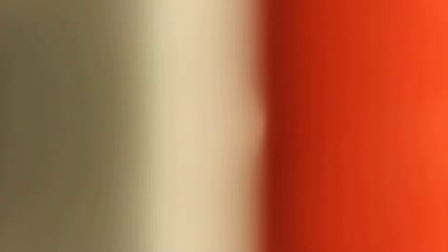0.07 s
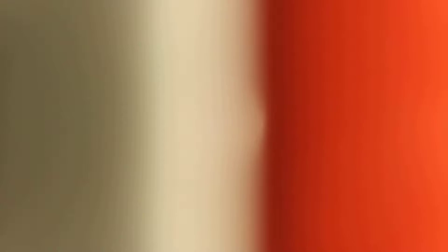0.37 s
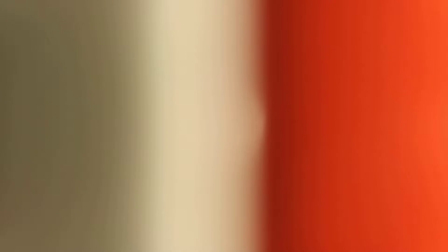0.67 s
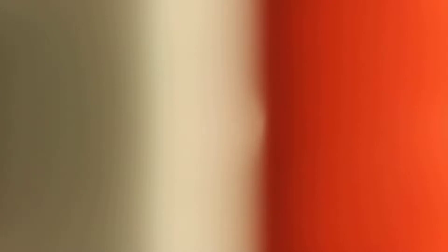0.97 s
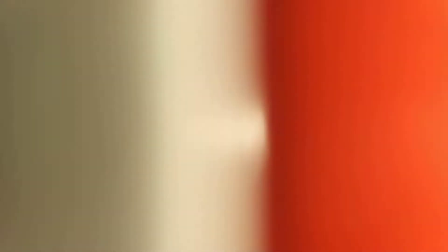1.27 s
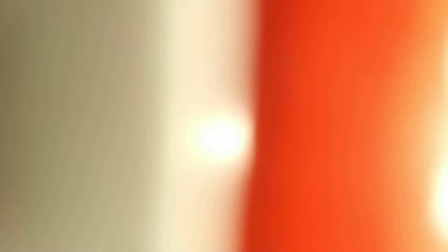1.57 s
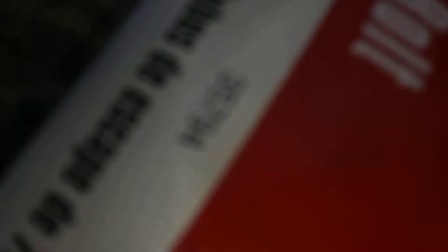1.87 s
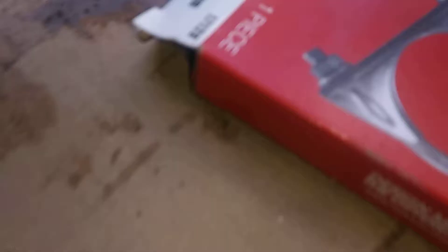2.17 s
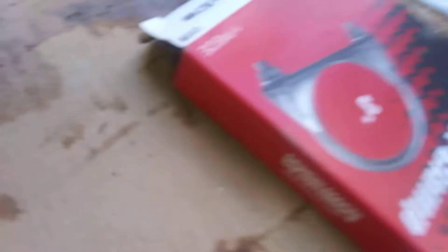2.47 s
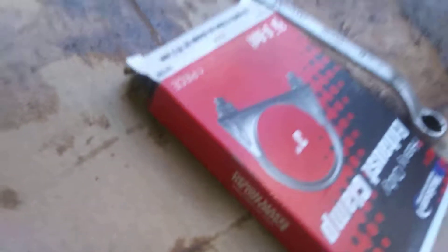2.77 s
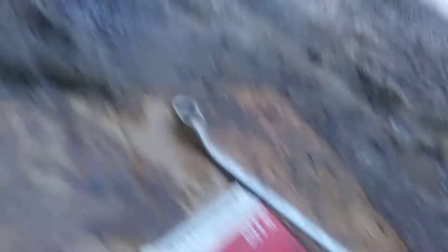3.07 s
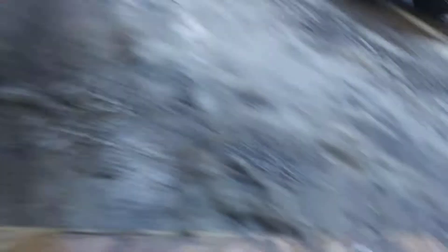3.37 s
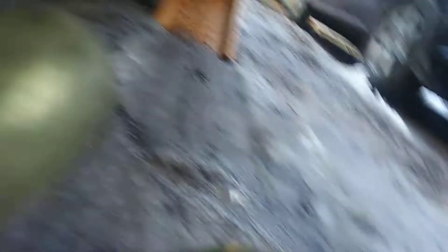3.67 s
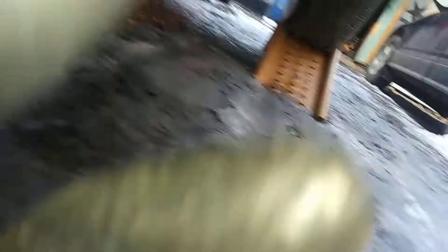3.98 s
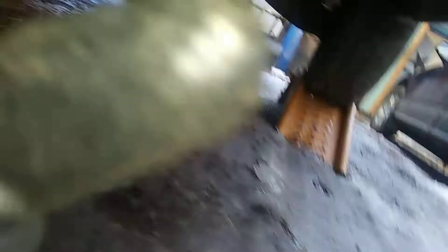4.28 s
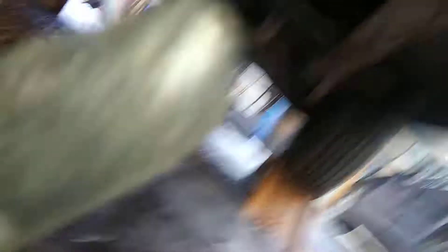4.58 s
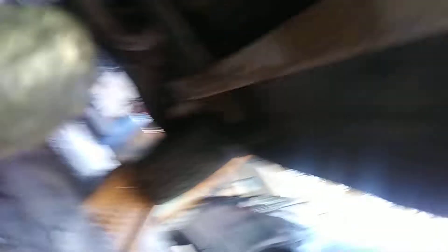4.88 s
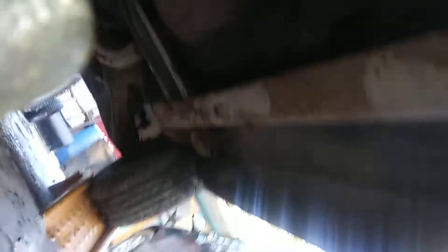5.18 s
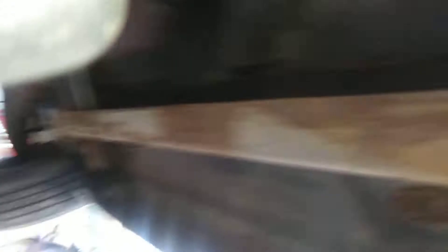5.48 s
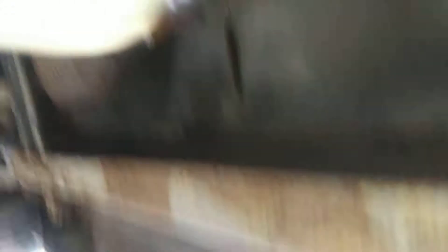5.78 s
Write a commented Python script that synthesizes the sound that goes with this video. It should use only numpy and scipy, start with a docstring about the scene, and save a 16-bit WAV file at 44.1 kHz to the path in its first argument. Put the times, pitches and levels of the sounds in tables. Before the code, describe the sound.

Handling noise comes first, right at the microphone: skin sliding on a plastic camera case and a cardboard box, with crisp snaps and dull taps. Then a low rumble grows into a hollow rush with a rising hiss, like a vehicle going by a driveway. It recedes into uneven clothing rustle, one soft bump on a hollow panel and a few crisp fabric scrapes, over a faint outdoor background.

```python
"""Hissing rubs, sharp clicks and soft knocks: fingers shift on a handheld camera and a cardboard package.
Outdoors a broad rush, perhaps a vehicle going by, swells and brightens. Then clothing rustles
and something hollow is bumped as the camera is lowered under a car.
Skin and cloth sound through tiny friction slips; snaps ring the plastic case, a push rings a panel.
Air and rush are shaped noise, the rush with resonances."""
import sys
import numpy as np
from scipy import signal
from scipy.fft import rfft, irfft
from scipy.io import wavfile

SR = 44100
rng = np.random.default_rng(int(sys.argv[2]) if len(sys.argv) > 2 else 0)


def transcribe(signal):
    """Save signal, clipped to [-1, 1], as a 16-bit WAV file at the path in sys.argv[1]."""
    frames = np.atleast_2d(signal).T
    limited = np.clip(frames, -1, 1)
    pcm = np.round(limited * 32767).astype(np.int16)
    wavfile.write(sys.argv[1], SR, pcm)


N = 261072
T = np.arange(N) / SR
START_S = 0.252  # silence until here


def amp(db):
    """Decibels to gain."""
    return 10 ** (np.asarray(db) / 20)


def unit(x):
    """Scale to rms 1."""
    return x / np.sqrt(np.mean(x ** 2) + 1e-20)


def add(mix, time_s, sound):
    """Mix a sound in at time_s."""
    part = mix[max(round(time_s * SR), 0):][:len(sound)]
    part += sound[:len(part)]


def highpass(x, hz, order):
    """Butterworth bass cut."""
    return signal.sosfilt(signal.butter(order, hz, "high", fs=SR, output="sos"), x)


def colour(x, points):
    """Filter by (frequency [Hz], gain [dB]) points on a log axis; rms 1."""
    hz, db = np.transpose(points)
    bins_hz = np.fft.rfftfreq(N, 1 / SR)
    gain = amp(np.interp(np.log(bins_hz + 1), np.log(hz + 1), db))
    return unit(irfft(rfft(x) * gain, N))


def resonate(x, hz, width_hz):
    """Resonance of gain 1; hz is a number or a curve."""
    turn = np.exp(2j * np.pi * np.cumsum(np.full(N, hz)) / SR)
    pole = np.exp(-np.pi * width_hz / SR)
    return 2 * (turn * signal.lfilter([1 - pole], [1, -pole], x / turn)).real


def wander(rate_hz):
    """Smooth random curve, rms 1."""
    bins_hz = np.fft.rfftfreq(N, 1 / SR)
    return unit(irfft(rfft(rng.standard_normal(N)) * np.exp(-(bins_hz / rate_hz) ** 2), N))


def friction(slips_per_s, spread_db, smooth):
    """Tiny slips of uneven size over a smooth sliding hiss."""
    sizes = amp(spread_db * np.minimum(rng.exponential(1, N), 4))
    slips = sizes * rng.choice([-1, 1], N) * (rng.random(N) < slips_per_s / SR)
    return unit(unit(slips) + smooth * rng.standard_normal(N))


def swell(peak_s, rise_s, fall_s):
    """Asymmetric bell of height 1."""
    return np.exp(-(abs(T - peak_s) / np.where(T < peak_s, rise_s, fall_s)) ** 1.35)


def plateau(start_s, end_s, db, rise_db_per_s, drift_db_per_s, fall_db_per_s):
    """Gain that climbs to db, drifts from start_s to end_s, then falls."""
    rise_db = rise_db_per_s * np.maximum(start_s - T, 0)
    drift_db = drift_db_per_s * np.clip(T - start_s, 0, end_s - start_s)
    fall_db = fall_db_per_s * np.maximum(T - end_s, 0)
    return amp(db - rise_db + drift_db - fall_db)


def fade_in(rise_s=0.12):
    """Gain that opens out of silence."""
    return 1 - np.exp(-np.maximum(T - START_S, 0) / rise_s)


def air(db=-45):
    """Steady outdoor background with a slight flutter."""
    # air spectrum: (frequency [Hz], gain [dB])
    spectrum = [(30, -65), (70, -35.5), (140, -8.5), (240, -3.5), (400, -5), (800, 1.5), (1000, -3.5),
                (1220, 0), (2200, -9.5), (5300, -22.5), (6600, -20.5), (8000, -35), (15500, -31)]
    return amp(db) * fade_in() * colour(rng.standard_normal(N) * amp(0.5 * wander(23)), spectrum)


def rush(low_hz=860, high_hz=1540, climb_mid_s=3.4, climb_s=0.33, roar_hiss_db=-11.5):
    """A hollow roar swells over a long rumble; a gritty band of hiss climbs above it."""
    # swell of each layer: (start [s], end [s], level [dB], rise [dB/s], drift [dB/s], fall [dB/s])
    rumble_pass = (2, 3.5, -47, 9, -1, 13)
    roar_pass = (2.5, 3.5, -35.5, 12, -1.5, 24)
    hiss_pass = (3.5, 4, -35.5, 23, 1.5, 26)
    # spectrum of each layer: (frequency [Hz], gain [dB])
    rumble_spectrum = [(40, -60), (80, -46), (130, -13), (180, -3.5), (240, 4.5), (330, -2.5), (600, -25),
                       (3000, -60)]
    roar_spectrum = [(30, -59), (80, -44), (140, -25), (215, -6.5), (330, -3.5), (600, -0.5), (850, -3.5),
                     (1100, -9.5), (1620, -7.5), (2100, -21.5), (6500, -38), (15500, -54)]
    hiss_spectrum = [(100, -29), (165, 2.5), (450, -2), (900, 4.5), (1600, -1), (2550, -1), (3200, -2),
                     (4400, -0.5), (5500, -4.5), (6500, 0), (7900, -11), (9500, -7.5), (15500, -16)]
    # roar resonances: (frequency [Hz], width [Hz], gain [dB])
    modes = [(236, 11, -2), (370, 20.5, 4), (520, 25, 2), (720, 270, -7.5)]
    noise = rng.standard_normal(N) * amp(0.42 * wander(33))
    hollow = noise + sum(amp(db) * resonate(noise, hz, width_hz) for hz, width_hz, db in modes)
    roar_gain = plateau(*roar_pass)
    roar = roar_gain * colour(hollow, roar_spectrum)
    climb = 1 / (1 + np.exp((climb_mid_s - T) / climb_s))
    centre_hz = (low_hz + (high_hz - low_hz) * climb) * (1 + 0.082 * wander(13))
    band = resonate(friction(slips_per_s=900, spread_db=2.5, smooth=1.4), centre_hz, width_hz=1100)
    band += 0.24 * resonate(band, 1.32 * centre_hz, width_hz=400)  # sharp upper crest
    rumble = plateau(*rumble_pass) * colour(rng.standard_normal(N), rumble_spectrum)
    hiss_gain = np.hypot(plateau(*hiss_pass), amp(roar_hiss_db) * roar_gain)
    hiss = hiss_gain * amp(0.34 * wander(44)) * colour(band, hiss_spectrum)
    return fade_in() * (rumble + roar + hiss)


def surges(glide_per_s=0.11):
    """Gritty narrow bands stand out of the rush and rustle, gliding slightly upward."""
    # swelling bands: (peak time [s], half width [s], centre [Hz], width [Hz], level [dB])
    bands = [(2.73, .19, 805, 170, -40), (2.83, 0.066, 566, 220, -37.5), (2.78, 0.19, 372, 110, -42),
             (3.1, 0.086, 396, 200, -38), (3.39, 0.12, 565, 260, -36.5), (3.74, 0.1, 1650, 335, -38.5),
             (3.98, 0.07, 1170, 260, -40.5), (4.05, 0.099, 1650, 260, -39.5), (4.1, 0.13, 2560, 220, -43),
             (4.11, 0.026, 1000, 600, -36.5), (4.22, 0.11, 2060, 500, -39.5),
             (4.24, 0.13, 1380, 704, -40.5), (4.14, 0.25, 5200, 2000, -44.5), (4.15, 0.47, 730, 131, -46.5),
             (5.35, 0.49, 860, 99, -56), (5.54, 0.032, 4860, 1300, -40), (5.862, 0.016, 1500, 600, -39)]
    out = np.zeros(N)
    for peak_s, half_s, hz, width_hz, db in bands:
        centre_hz = hz * (1 + glide_per_s * np.clip(T - peak_s, -1, 1))
        grit = friction(slips_per_s=450, spread_db=0.5, smooth=1.0)
        band = resonate(resonate(grit, centre_hz, width_hz), centre_hz, width_hz)
        out += amp(db) * swell(peak_s, half_s, half_s) * unit(band)
    return highpass(out, hz=230, order=4)


def cloth(start_s=3.93, rest_db=-60, growth_db_per_s=6.5, hard_pull_db=-37, edge_db=-9, trim_db=1):
    """Fabric drags over the ground in dense fine slips; a hard pull adds a crisp edge."""
    # cloth drags: (peak time [s], rise [s], fall [s], pull [dB])
    drags = [(4.07, .09, 0.12, -44), (4.213, 0.041, 0.15, -39), (4.584, 0.16, 0.027, -40),
             (4.668, 0.019, 0.018, -47), (4.83, 0.05, .05, -52.5), (5.03, 0.13, 0.19, -42),
             (5.29, 0.034, 0.069, -49.5), (5.452, 0.023, .055, -40.5), (5.529, 0.02, 0.14, -37.5),
             (5.74, 0.1, 0.08, -48.5), (5.83, 0.02, 0.039, -35.5), (5.868, 0.028, 0.058, -36)]
    # fibre and edge spectra: (frequency [Hz], gain [dB])
    fibre_spectrum = [(100, -38), (250, -4), (750, -0.5), (1900, 5), (3100, 1.5), (4700, -0.5), (5650, -9),
                      (6400, 1), (7100, -6), (8000, -13), (10000, -12), (12500, -21), (15500, -22)]
    edge_spectrum = [(1000, -35), (3000, -13), (5400, 1.5), (7000, -5), (8000, -10), (15500, -18)]
    pulls = [amp(db) * swell(peak_s, rise_s, fall_s) for peak_s, rise_s, fall_s, db in drags]
    # light rubbing between drags grows as the camera sinks
    rest = amp(rest_db + growth_db_per_s * (T - start_s)) * (T > start_s)
    pull = np.linalg.norm(pulls + [rest], axis=0)
    fibres = colour(friction(slips_per_s=5000, spread_db=3.5, smooth=1.0), fibre_spectrum)
    edge = amp(edge_db) * pull / amp(hard_pull_db) * colour(rng.standard_normal(N), edge_spectrum)
    return amp(trim_db) * pull * (fibres + edge) * amp(0.93 * wander(50))


def bump(peak_s=5.115, ring_db=-32, scuff_db=-46):
    """A soft scuffing push rings a hollow panel."""
    # push spectrum: (frequency [Hz], gain [dB])
    spectrum = [(40, -46), (90, -25), (140, -6), (240, -9), (500, 0), (1000, -7), (3000, -14), (15000, -60)]
    # panel modes: (frequency [Hz], width [Hz], relative level [dB])
    modes = [(146.5, 8.7, -5.5), (236, 4.2, -2), (350, 20, -7), (487, 33, -10), (860, 20, -4)]
    push = swell(peak_s, rise_s=0.021, fall_s=0.033) * colour(rng.standard_normal(N), spectrum)
    ring = sum(amp(db) * unit(resonate(push, hz, width_hz)) for hz, width_hz, db in modes)
    return amp(ring_db) * ring / abs(ring).max() + amp(scuff_db) * push


def palm(hz=1210, width_hz=110, db=-52):
    """The hollow of a cupped hand rings faintly and fades."""
    hollow = unit(resonate(rng.standard_normal(N), hz, width_hz))
    onset = np.clip((T - START_S) / 0.028, 0, 1)
    return amp(db) * swell(peak_s=0.48, rise_s=0.22, fall_s=1.0) * onset * hollow


def peel():
    """Skin unsticks from the smooth case in sprays of tiny high ticks."""
    # tick sprays: (peak time [s], half width [s], level [dB])
    sprays = [(1.11, 0.16, -54), (2.27, 0.17, -64), (4.67, 0.041, -55.5)]
    slips = friction(slips_per_s=130, spread_db=3.5, smooth=0)
    ticks = colour(slips, [(1000, -30), (4000, 3), (7000, -3), (15000, -3)])
    return ticks * sum(amp(db) * swell(peak_s, half_s, half_s) for peak_s, half_s, db in sprays)


def squeak(peak_s=3.028, half_s=0.068, hz=4950, sag_hz_per_s=5000, db=-52):
    """A finger catches on the smooth case: a thin, sinking squeak."""
    pitch_hz = hz - sag_hz_per_s * np.clip(T - peak_s, -0.1, 0.1)
    band = unit(resonate(rng.standard_normal(N), pitch_hz, width_hz=330))
    return amp(db) * swell(peak_s, half_s, half_s) * band


def strokes(skin_hz=4500, press_hz_per_db=75, catch_rate_hz=130, treble_hz=7500):
    """Sliding skin hisses, catching and letting go; coarser slips shake the case."""
    # finger strokes: (peak time [s], rise [s], fall [s], hiss [dB], scrape [dB], treble gain [dB])
    rubs = [(0.263, .011, 0.018, -53.5, -59, -1), (0.45, 0.045, 0.056, -41.5, -54, -1),
            (0.573, 0.016, 0.024, -34.5, -55, -1.5), (0.67, 0.096, 0.088, -46, -38.5, -4),
            (0.72, 0.019, 0.018, -36, -47, -6), (0.773, .005, .018, -31, -39, -10),
            (.84, 0.017, 0.008, -38.5, -40.5, 2), (.955, 0.041, 0.022, -39, -47, -7),
            (1.07, 0.23, 0.28, -52, -45, 1.5), (1.295, 0.015, 0.037, -53.5, -36, 10),
            (1.391, 0.021, 0.0071, -30.5, -41.5, 0.5), (1.481, 0.017, 0.023, -44.5, -39, -2),
            (1.524, 0.016, 0.016, -51, -35.5, 8), (1.553, 0.0067, 0.022, -45, -29, -9),
            (1.611, 0.04, 0.052, -38, -40.5, 7.5), (1.708, .06, .06, -40.5, -44, 2),
            (1.772, .012, 0.015, -55, -40, 0), (3.035, 0.074, 0.032, -51.5, -46, 7),
            (3.34, 0.13, 0.14, -47.5, -41, -2), (3.54, 0.02, 0.015, -60, -35, -4),
            (4.28, 0.18, 0.16, -49, -41.5, 0), (4.516, 0.04, 0.067, -56, -42, -4)]
    # skin hiss and case scrape spectra: (frequency [Hz], gain [dB])
    hiss_spectrum = [(200, -14), (1500, 1), (2700, -4.5), (3400, -1), (5200, -3), (6400, 0.5), (7100, -3),
                     (8000, -10), (12000, -15.5), (15500, -20)]
    scrape_spectrum = [(50, -58), (120, -15), (300, 2.5), (480, 1.5), (620, -0.5), (950, 0), (1700, -4.5),
                       (2700, -13), (6000, -28), (15000, -50)]
    hiss = colour(friction(slips_per_s=2200, spread_db=2.5, smooth=0.97), hiss_spectrum)
    times_s, _, _, hisses_db, scrapes_db, _ = np.transpose(rubs)
    press_db = np.interp(T, times_s, scrapes_db - hisses_db)  # harder press: more scrape, lower pitch
    centre_hz = (skin_hz - press_hz_per_db * press_db) * (1 + 0.15 * wander(60))
    hiss += resonate(hiss, centre_hz, width_hz=1100)
    hiss = unit(hiss * amp(wander(catch_rate_hz)))
    scrape = colour(friction(slips_per_s=1100, spread_db=3.5, smooth=0.96), scrape_spectrum)
    treble = signal.sosfiltfilt(signal.butter(3, treble_hz, "high", fs=SR, output="sos"), hiss)
    out = np.zeros(N)
    for peak_s, rise_s, fall_s, hiss_db, scrape_db, treble_db in rubs:
        skin = amp(hiss_db) * (hiss + (amp(treble_db) - 1) * treble)
        out += swell(peak_s, rise_s, fall_s) * (skin + amp(scrape_db) * scrape)
    return out * (T > START_S)


def knocks(contact_s=0.00057):
    """A fingertip lands softly: a few dull cycles, no bass."""
    # fingertip landings: (time [s], peak [dB], frequency [Hz], t60 [s])
    landings = [(.629, -29, 600, .012), (0.663, -25, 1730, 0.005), (.669, -29.5, 400, 0.012),
                (.678, -29, 1900, .006), (.6875, -25, 1680, 0.0036), (.842, -26, 1660, 0.005),
                (.931, -22.5, 1630, 0.008), (.9312, -23.5, 884, 0.029), (1.1823, -27.5, 875, 0.0084),
                (1.195, -30, 1300, .007), (1.2022, -25.5, 480, 0.03), (1.2029, -28, 290, 0.017),
                (1.2044, -29.5, 2090, .005), (1.2947, -19, 860, 0.013), (1.369, -24, 600, 0.012),
                (1.37, -27, 326, 0.021), (1.549, -24, 983, 0.067), (1.549, -29, 1500, .006),
                (1.559, -26, 320, 0.07), (3.346, -22, 1050, 0.009), (3.431, -25, 1560, 0.0088),
                (3.534, -25, 1500, 0.0036), (3.55, -24, 1300, 0.0033), (5.078, -35, 520, 0.0091)]
    t = np.arange(SR // 10) / SR
    attack = 1 - np.exp(-t / contact_s)
    out = np.zeros(N)
    for time_s, db, hz, t60_s in landings:
        knock = np.gradient(attack * amp(-60 * t / t60_s) * np.sin(2 * np.pi * hz * t))
        add(out, time_s, amp(db) * knock / abs(knock).max())
    return out


def clicks(ring_trim_db=2, tick_trim_db=-1, rebound=0.62, crack=0.15, crack_s=0.0012):
    """A sharp push, a rebound and slight cracking ring the case, pitched by the spot, with a fine tick."""
    # case snaps: (time [s], ring level [dB], tick level [dB], pitch [ratio], rebound delay [s])
    snaps = [(0.7636, -22, -39, 1.3, 0.00085), (.805, -26, -49, 0.94, 0.00084),
             (0.843, -29, -32, 1.5, .0007), (0.897, -23.5, -52, 1.13, 0.00054),
             (.931, -6.5, -20.5, 0.98, .00098), (0.934, -16, -17, 0.93, .0006),
             (1.05, -21, -25, 1.2, .00065), (1.0543, -17.5, -21, 0.89, 0.00091),
             (1.079, -25.5, -37, 0.94, 0.00073), (1.182, -32.5, -36, 0.9, 0.00069),
             (1.2042, -30.5, -30.5, 0.94, .0008), (1.285, -27, -42, 0.78, .0007),
             (1.288, -27, -33, 0.88, .0009), (1.2945, -28, -34, .65, 0.00071),
             (1.4007, -34, -23, 0.77, 0.00092), (1.5196, -32, -32, 1.1, .0007),
             (2.0264, -33, -36, 0.67, .0004), (2.2026, -38.5, -50, 0.83, .0007),
             (2.9097, -36, -42, 0.65, .0006)]
    # plastic case modes: (frequency [Hz], relative level [dB], t60 [s])
    modes = [(1650, -19, 0.011), (2540, -7.5, 0.0046), (3950, 7.5, 0.0033), (5200, 7.5, 0.0052),
             (5930, 1.5, 0.0045), (6480, -8, 0.017)]
    t = np.arange(1024) / SR
    decay = np.exp(-t / crack_s)
    ring_filter = signal.butter(8, 6900, fs=SR, output="sos")
    tick_filter = signal.butter(1, [7500, 14000], "band", fs=SR, output="sos")
    out = np.zeros(N)
    for time_s, ring_db, tick_db, pitch, delay_s in snaps:
        crack_noise, tick_noise = rng.standard_normal((2, len(t)))
        case = sum(amp(db - 60 * t / t60_s) * np.cos(2 * np.pi * pitch * hz * t)
                   for hz, db, t60_s in modes)
        push = (t == 0) + rebound * np.sinc((t - delay_s) * SR) + crack * crack_noise * decay
        ring = signal.sosfilt(ring_filter, signal.fftconvolve(push, case))
        tick = signal.sosfilt(tick_filter, tick_noise * decay ** 2)
        add(out, time_s, amp(ring_db + ring_trim_db) * ring / abs(ring).max())
        add(out, time_s, amp(tick_db + tick_trim_db) * tick / abs(tick).max())
    return highpass(out, hz=400, order=2)


def scene():
    """All sources at one microphone."""
    handling = strokes() + clicks() + knocks() + peel() + palm() + squeak()
    handling = highpass(handling, hz=155, order=2)  # a small case radiates no bass
    return (handling + air() + rush() + surges() + cloth() + bump())[None]


def record(dry):
    """Band limit at 16 kHz."""
    lowpass = signal.firwin(511, 16000, window=("kaiser", 9), fs=SR)
    return signal.oaconvolve(dry, lowpass[None], "same")


dry = scene()
out = record(dry)
transcribe(out)
```